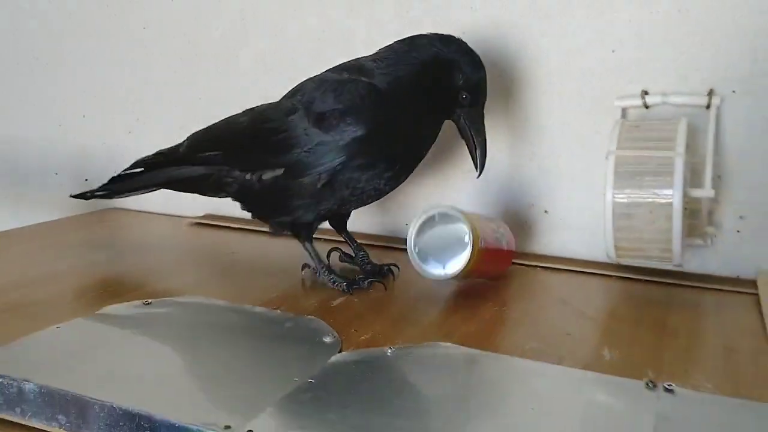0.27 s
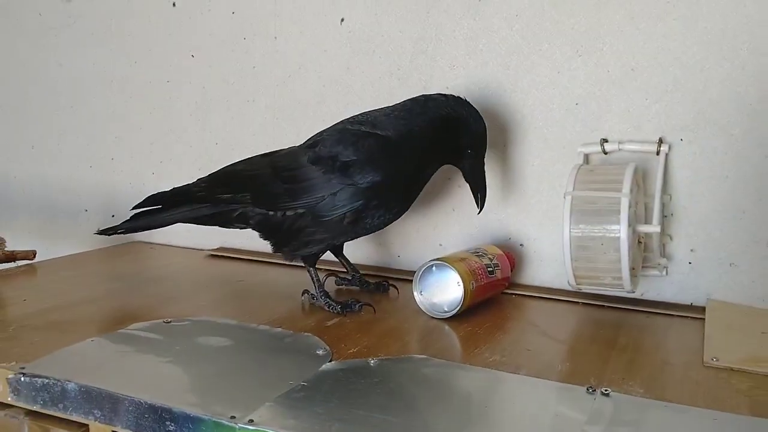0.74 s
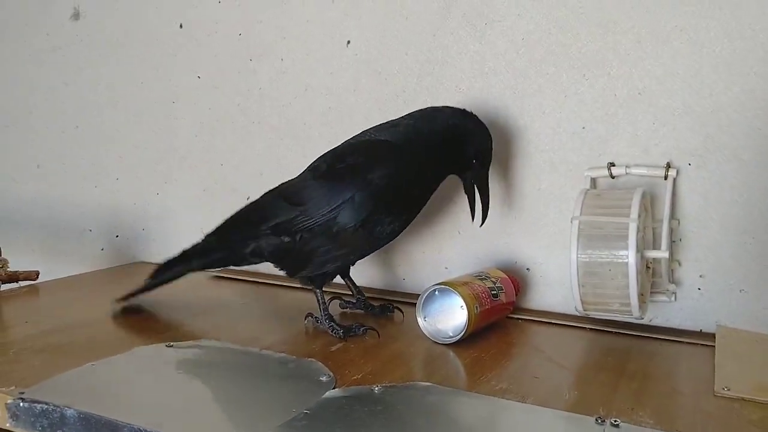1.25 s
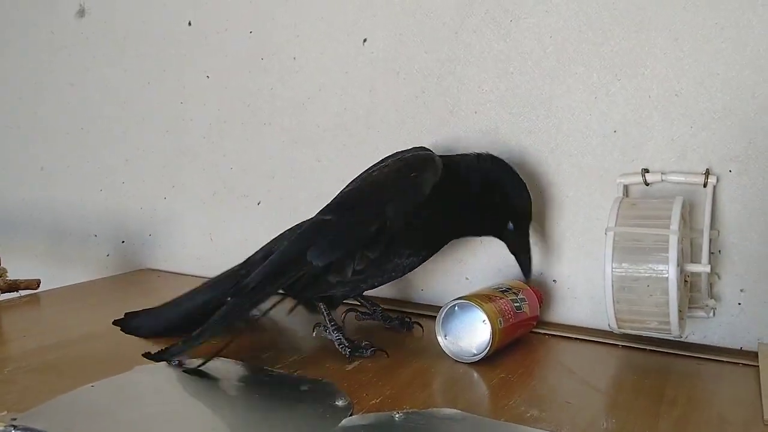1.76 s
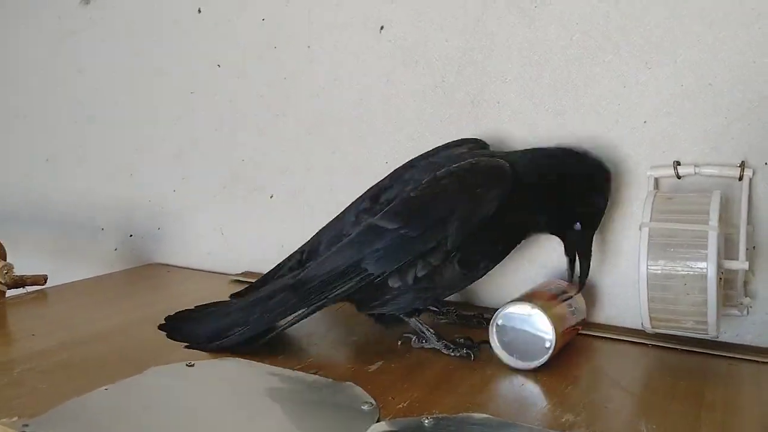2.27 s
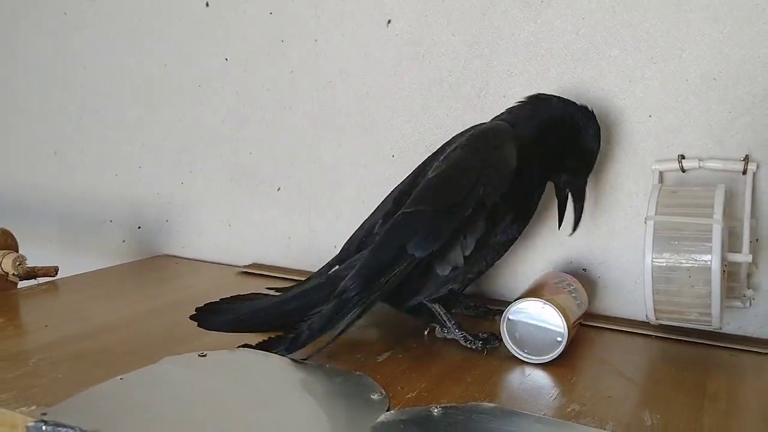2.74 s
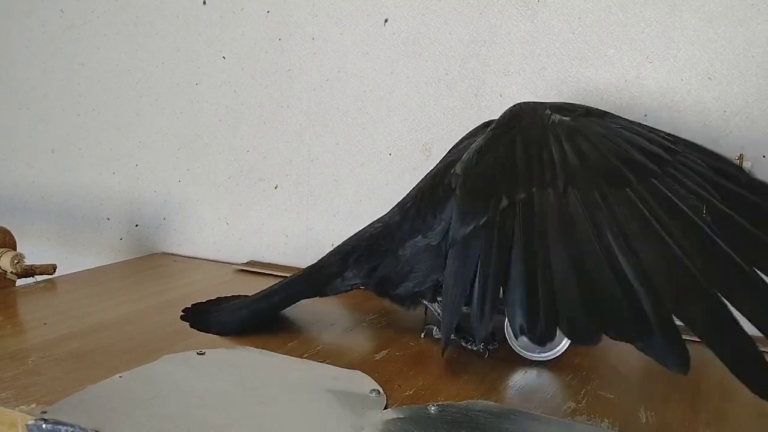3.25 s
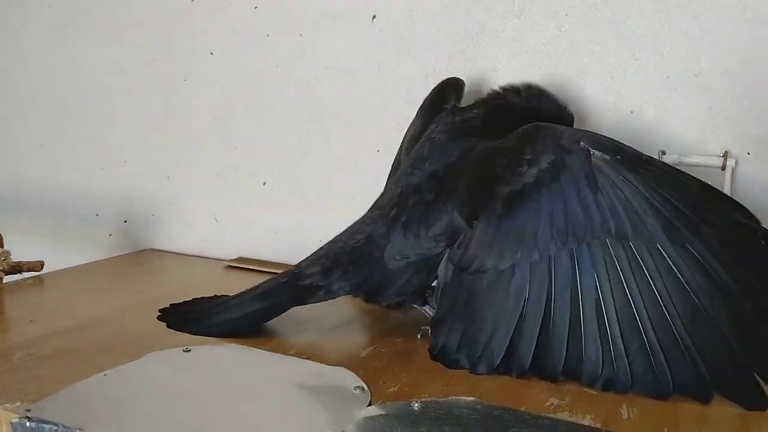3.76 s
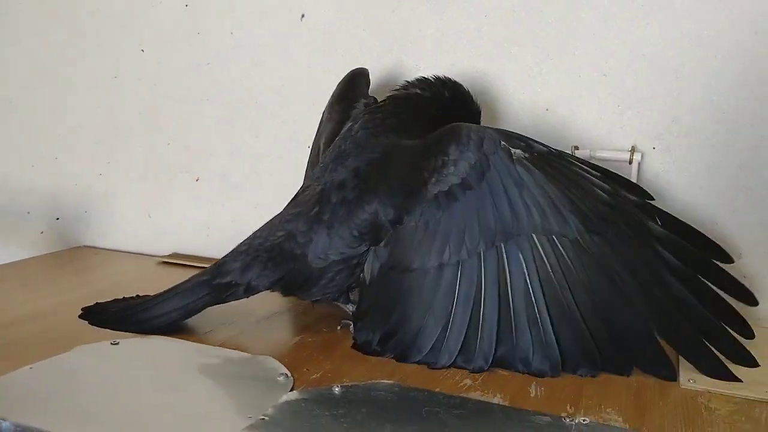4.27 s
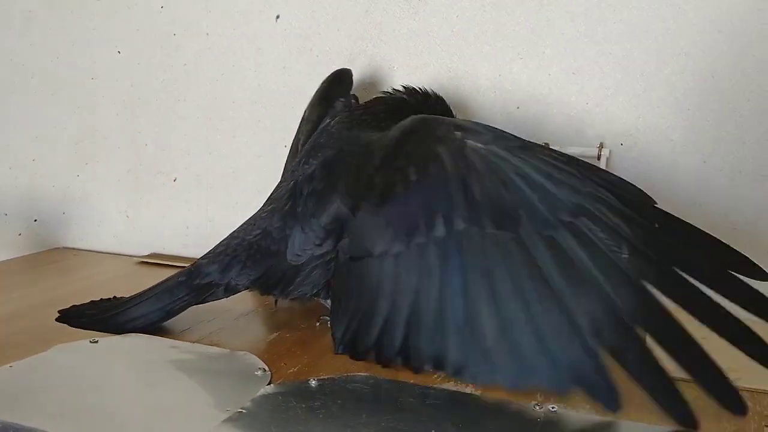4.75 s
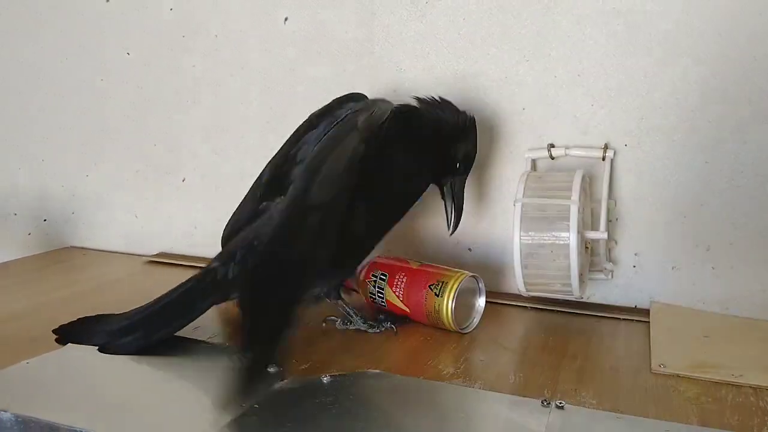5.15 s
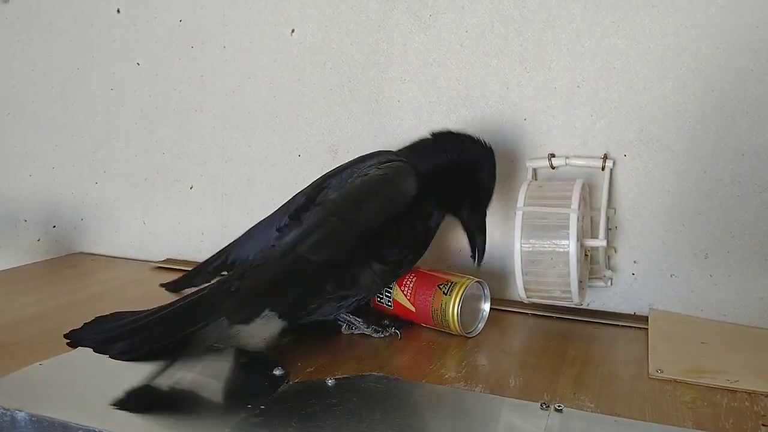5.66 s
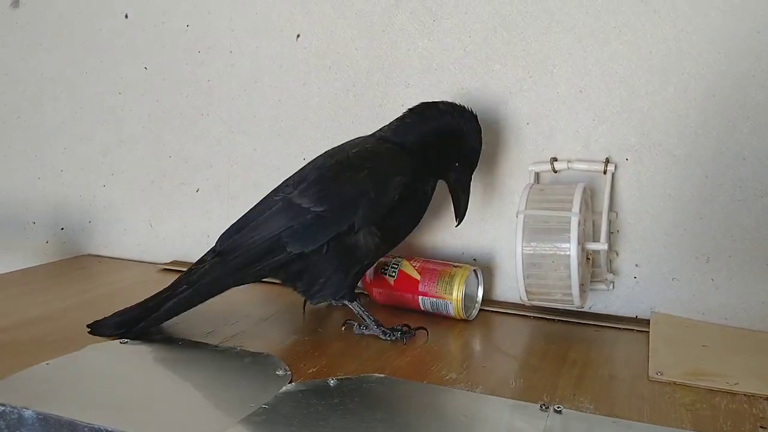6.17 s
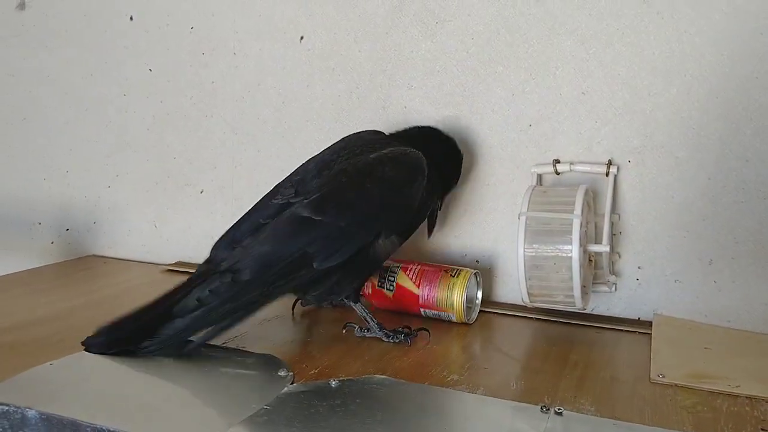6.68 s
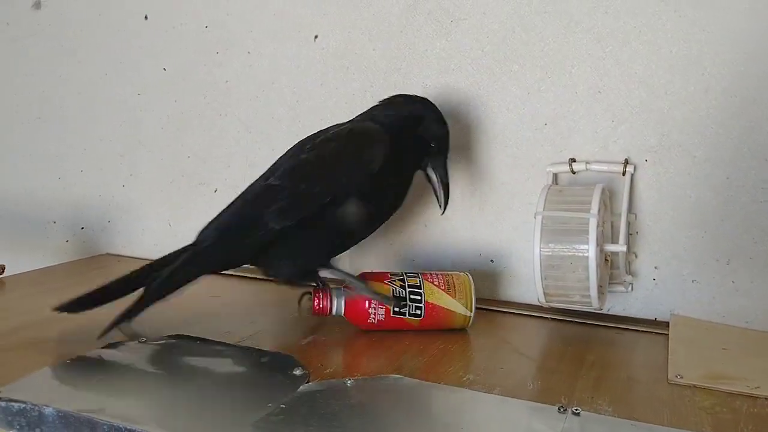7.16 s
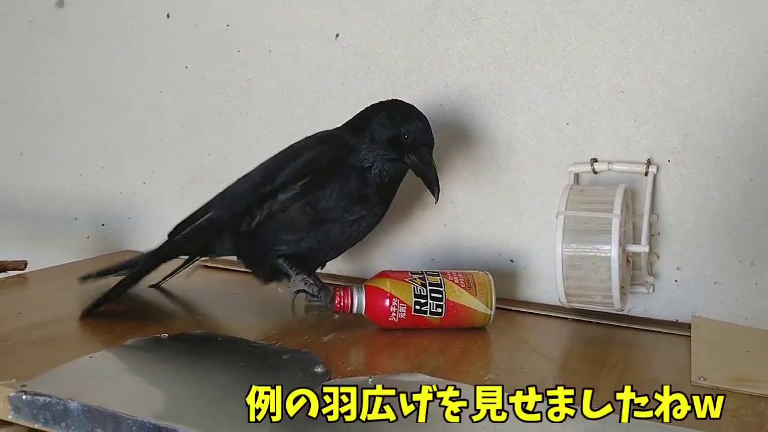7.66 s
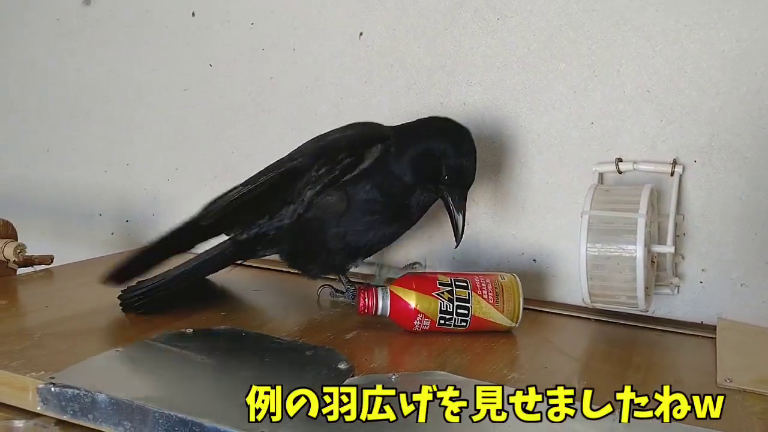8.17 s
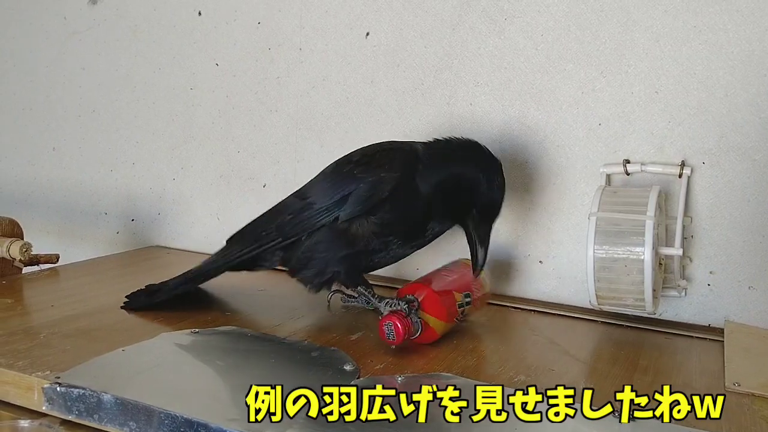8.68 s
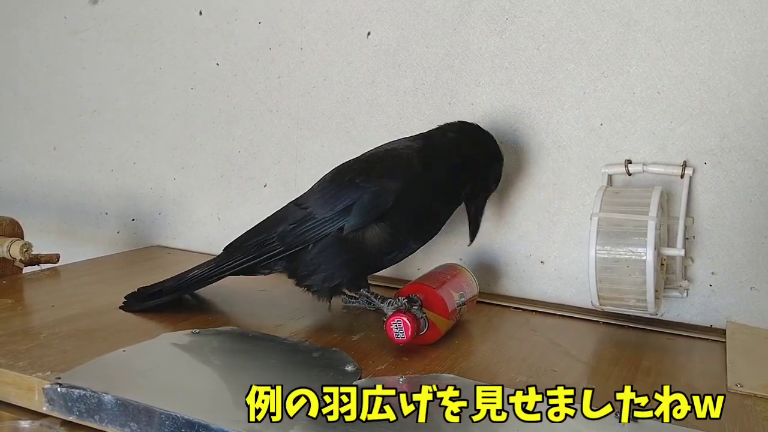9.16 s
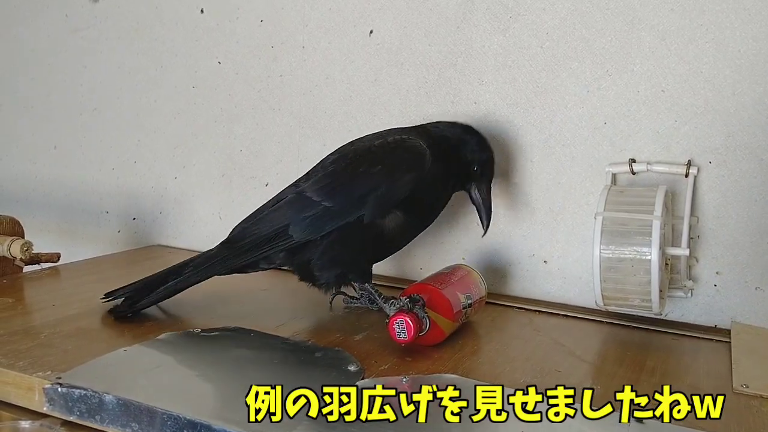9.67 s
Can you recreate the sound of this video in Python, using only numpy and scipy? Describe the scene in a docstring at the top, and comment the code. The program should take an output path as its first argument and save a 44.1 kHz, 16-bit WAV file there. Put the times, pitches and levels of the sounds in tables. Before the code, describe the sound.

An empty aluminium bottle clatters onto a wooden table, then a crow's beak taps and shoves it while wing feathers brush the wood in a small room.

```python
"""A crow pecks and shoves an empty aluminium bottle about a wooden table in a small bare room.
A faint room tone runs throughout: coloured noise and a slightly wavering hum.
From the start, knocks and taps click with noise, ring the bottle and thump the table; the room echoes them.
Later feathers brush the table as softly coloured, fluttering noise while the bird spreads its wings.
After some shoves the bottle rocks in ever quicker, weaker bounces, and a faint low sine note swells."""
import sys
import numpy as np
from scipy import signal
from scipy.fft import rfft, irfft
from scipy.io import wavfile

SR = 44100
rng = np.random.default_rng(int(sys.argv[2]) if len(sys.argv) > 2 else 0)


def int16_out(signal):
    """Quantize to a 16-bit WAV file."""
    q = np.round(np.clip(np.atleast_2d(signal).T, -1, 1) * 32767)
    wavfile.write(sys.argv[1], SR, q.astype(np.int16))


N = 437472
TIME = np.arange(N) / SR  # seconds into the scene

SIZE = 24000  # samples in one blow and its echo
AGE = np.arange(SIZE) / SR  # seconds since the blow
HZ = np.fft.rfftfreq(SIZE, 1 / SR) + 1e-3  # kept just above zero


def undb(db):
    """Decibels to gain."""
    return 10 ** (np.asarray(db) / 20)


def unit(x):
    """Scale to rms 1."""
    return x / np.sqrt(np.mean(np.abs(x) ** 2))


def curve(rows):
    """Join (seconds, value) rows by straight lines."""
    return np.interp(TIME, *np.transpose(rows))


def walk(rate):
    """Random wandering of rms 1: straight lines between `rate` random points per second."""
    steps = rng.standard_normal(4096)
    return unit(np.interp(TIME * rate, np.arange(len(steps)), steps))


def swells(rows):
    """Gain of swells that climb and sink by 20 dB in their rise and fall times."""
    gain = 0
    for peak_s, db, rise_s, fall_s in rows:
        distance = np.maximum((peak_s - TIME) / rise_s, (TIME - peak_s) / fall_s)
        gain = gain + undb(db - 20 * distance)
    return gain


def colour(points, hz):
    """Gain of (Hz, dB) points joined on a log-frequency axis."""
    point_hz, db = np.transpose(points)
    return undb(np.interp(np.log(hz + 1), np.log(point_hz), db))


def diffuse(envelope, spacing_m=0.15):
    """Spectra of noise from all sides at two ports: alike in the bass, unrelated in the treble."""
    mid, side = rfft(rng.standard_normal((2, len(envelope))) * envelope)
    hz = np.fft.rfftfreq(len(envelope), 1 / SR)
    alike = 0.97 * np.sinc(2 * hz * spacing_m / 343)  # sound travels 343 m/s
    return mid * np.sqrt(1 + alike) + side * np.sqrt(1 - alike) * np.array([[1], [-1]])


def steady_noise(points):
    """Coloured stereo noise of rms 1."""
    spectrum = diffuse(np.ones(N)) * colour(points, np.fft.rfftfreq(N, 1 / SR))
    return unit(irfft(spectrum, N))


def room_tone(sway_db=0.74):
    """Quiet air noise and a slightly unsteady hum."""
    # Colour of the air noise. Each row: frequency in Hz, relative level in dB
    air_colour = [(12, -41.5), (20, -3), (56, -7), (118, -36), (135, -13), (177, -22.5), (258, -13),
                  (387, -17.5), (682, -12), (759, -20), (845, -13), (967, -18), (1450, -17), (2350, -27.5),
                  (12500, -38), (16200, -69.5), (22000, -120)]
    # Steady hum tones. Each row: frequency in Hz, middle level in dB
    hum_tones = [(50, -68), (269, -69), (643, -73.5)]
    hum = 0
    for hz, db in hum_tones:
        hum = hum + np.sqrt(2) * undb(db + 2.5 * walk(4.2)) * np.sin(2 * np.pi * hz * TIME)
    air_db = -56 + sway_db * walk(3)
    return steady_noise(air_colour) * undb(air_db) + hum


def mode(hz, width):
    """Response of one damped resonance, gain 1 at its centre."""
    return 1 / (1 + 1j * (HZ ** 2 - hz ** 2) / (HZ * width))


def resonances(modes):
    """Response of a body; each mode is applied twice for steep flanks."""
    return sum(undb(db) * mode(hz, width) ** 2 for hz, width, db in modes)


def causal(gain):
    """Minimum-phase response of a gain curve: nothing sounds before the blow."""
    cepstrum = irfft(np.log(gain))
    cepstrum[1:SIZE // 2] *= 2
    cepstrum[SIZE // 2 + 1:] = 0
    return np.exp(rfft(cepstrum))


def contact(chatter_s, grit_db=6.5):
    """The touch bites, then fades in a chatter of micro-contacts."""
    grains = np.repeat(undb(grit_db * rng.standard_normal(SIZE // 20)), 20)
    age = AGE / chatter_s
    envelope = grains * (1 - np.exp(-8 * age)) * np.exp(-age / 2)
    return unit(diffuse(envelope, spacing_m=0.065))


def reverberation(t60, build_s):
    """The room's answer: reflections thicken, then die away by 60 dB in t60 seconds."""
    thicken = 1 - np.exp(-AGE / build_s)
    return unit(diffuse(thicken * np.exp(-np.log(1000) * AGE / t60)))


def blows(rows, click_colour, pan_db, push_db, hollow_push_db, metal_db):
    """Each blow drives table, bottle and contact noise, heard directly and through the room."""
    # In the next five, each row: frequency in Hz, width of one pass in Hz, relative level in dB
    # The table top bending as a whole
    thump_modes = [(50, 12, -12), (75, 17, -9.5), (153, 34.8, 8), (195, 41, -15.5)]
    # The table's boards
    board_modes = [(212, 44, -1.5), (235.7, 38, 3.5), (269.2, 50, 1), (223, 270, -18)]
    # The wood around the point of contact
    wood_modes = [(324.3, 43, -1), (387.5, 33.4, 0.5), (445.3, 41, 1), (469.8, 18, -1), (511, 47, -3),
                  (446, 320, -10.5)]
    # The bottle's hollow body
    hollow_modes = [(595.2, 18, 1), (650.4, 89, 4.5), (702, 52, -4.5), (773.6, 48, -0.5), (740, 635, -8.5),
                    (644, 21, -9)]
    # The higher bending modes of the bottle's shell
    shell_modes = [(884, 49, 5.5), (1007, 142, 1.5), (1187, 193, 2), (1282, 75, -0.5), (1394, 255, -4.5),
                   (1597, 100, -9), (1503, 1320, -7.5)]
    # The thin metal wall tinkles in many close modes. Each entry: frequency in Hz
    metal_hz = [1770, 2008, 2337, 2680, 2940, 3234, 3466, 3786, 4130, 4520, 4790, 5170, 5500, 5640, 6230,
                6710, 7530, 8400, 9470, 10580]
    # the wall behind the table cancels a narrow band of the bass
    null = 1 - mode(hz=98, width=21)
    body_modes = (thump_modes, board_modes, wood_modes, hollow_modes, shell_modes)
    bodies = [null * resonances(modes) for modes in body_modes]
    metal = np.array([mode(hz, width=70) for hz in metal_hz])
    contact_colour = causal(colour(click_colour, HZ))
    octaves = np.log2(np.clip(HZ, 1500, None) / 5000)  # brightness tilts around 5 kHz
    pan = undb(np.array([[pan_db], [-pan_db]]) / 2)
    span = np.sqrt(0.05 * SR)  # levels are the rms of a blow's energy spread over 50 ms
    fade = np.minimum(1, 10 * (1 - AGE / AGE[-1])) ** 2  # the tail ends in silence
    out = np.zeros((2, N + SIZE))
    for s, *levels_db, bright_db, direct_db, chatter_s in rows:
        touch = contact(chatter_s)
        # thump, boards and wood get slightly less direct sound than the click, the hollow body more
        push = undb(push_db + direct_db) * touch
        deep = reverberation(t60=0.3, build_s=0.002) + push
        low = reverberation(t60=0.42, build_s=0.0004) + push
        mid = reverberation(t60=0.42, build_s=0.0024) + undb(hollow_push_db) * push
        high = reverberation(t60=0.33, build_s=0.0026 + chatter_s) + undb(direct_db) * touch * pan
        # each spot on the bottle wakes its own mix of metal modes
        tinkle = undb(metal_db) * rng.standard_normal(len(metal_hz)) @ metal
        click = contact_colour * (1 + tinkle) * undb(bright_db * octaves)
        drives = (deep, low, low, mid, high, high)
        blow = 0
        for db, body, drive in zip(levels_db, bodies + [click], drives):
            blow = blow + undb(db) * unit(body * drive)
        start = int(s * SR)
        out[:, start:start + SIZE] += span * fade * irfft(blow)
    return out[:, :N]


def body_levels(s, thump_db, body_db, hollow_db, click_db):
    """Levels of thump, boards, wood, hollow, shell and click, by the time and how hard the hit is."""
    # Levels against the body, as the bottle travels over the table and ends up underfoot
    # Each row: time in seconds, boards level in dB, shell level in dB before hardness is added
    body_shares = [(0.1, 1.5, -2), (0.9, -3.5, 0.5), (2.4, -4, 1), (3.3, -1.5, 0), (4.1, -1.5, -0.5),
                   (5.8, -1.5, 0.5), (6.6, -6, 0.5), (8.1, 0.5, -5.5), (8.4, 1, -3.5), (9.1, 7, -9.5),
                   (9.7, -2, -0.5)]
    times, boards_db, shell_db = np.transpose(body_shares)
    hardness_db = 0.14 * (click_db - body_db)  # a hit with more click wakes more of the shell
    boards = body_db + np.interp(s, times, boards_db)
    wood = body_db - 0.5
    shell = body_db + np.interp(s, times, shell_db) + hardness_db
    return thump_db, boards, wood, hollow_db, shell, click_db


def during(s, span):
    """True while s lies within the span."""
    return span[0] < s < span[1]


def knock(s, thump_db, body_db, hollow_db, click_db, bright_db, contact_s):
    """The bottle meets the table: a short contact stands out from the room, the spread wing screens it."""
    clean_db = 0.5 * np.log2(0.0032 / contact_s)  # more direct sound for each halving of the contact
    wing_db = -5 * during(s, (2.9, 5.1))  # the wing is open between these seconds
    direct_db = -1.5 + clean_db + wing_db
    levels_db = body_levels(s, thump_db, body_db, hollow_db, click_db)
    return s, *levels_db, bright_db, direct_db, contact_s


def tap(s, click_db, body_db, bright_db, direct_db, contact_s):
    """Beak or claw hits the metal: mostly click, with a little of the body."""
    thump_db = body_db - 14  # a tap hardly moves the table
    hollow_db = body_db + 2.5
    levels_db = body_levels(s, thump_db, body_db, hollow_db, click_db)
    return s, *levels_db, bright_db, direct_db, contact_s


def feathers(flutter_db=3.5, barb_db=2):
    """Vanes slide over the wood, catching and slipping barb by barb: noise with slow and fast flutter."""
    # Colour of the rustle. Each row: frequency in Hz, relative level in dB
    feather_colour = [(120, -1), (400, 7), (800, 8), (1500, 1.5), (3000, -1), (5500, 3), (8000, -4.5),
                      (12000, -10)]
    # Soft rustle between the sweeps. Each row: time in seconds, level in dB
    brush = [(0, -88), (1.45, -57), (2.3, -63), (3.2, -50.5), (3.9, -55.5), (4.8, -56.5), (5.2, -64),
             (5.6, -52), (6.1, -67), (6.7, -56), (7.35, -78), (9.92, -90)]
    # Feathers sweep over the table
    # Each row: peak in seconds, level in dB, rise in seconds, fall in seconds
    sweeps = [(1.85, -38, 0.27, 0.56), (2.56, -49, 0.088, 0.14), (2.91, -42, .12, 0.17),
              (3.52, -40, .07, 0.099), (4.27, -44, 0.45, 0.084), (4.65, -44, 0.24, 0.1),
              (4.98, -37, 0.26, 0.052), (5.79, -32, 0.081, 0.13), (7.02, -34, 0.22, 0.21),
              (7.48, -43, 0.045, 0.21), (8.09, -44.5, 0.057, 0.22)]
    catching = unit(undb(flutter_db * walk(32) + barb_db * walk(350)))
    loudness = np.hypot(undb(curve(brush)), swells(sweeps))
    return steady_noise(feather_colour) * catching * loudness


def rock(s, gap_s, *levels_db, count):
    """After a shove the bottle rocks in dull bounces, each sooner and weaker than the last."""
    for k in range(count):
        weaker_db = np.array(levels_db) - 6 * k
        yield knock(s, *weaker_db, bright_db=-8.5, contact_s=0.0015)
        s = s + gap_s * 0.8 ** k  # each gap is shorter than the one before


def lingering_note():
    """A faint, wavering sine note hangs on between the knocks."""
    # Swells of the note. Each row: peak in seconds, level in dB, rise in seconds, fall in seconds
    note_swells = [(2.25, -52.5, .2, .5), (2.85, -45, 0.21, 0.23), (3.33, -51, .1, .3),
                   (3.8, -45, 0.25, .12), (5.1, -54.5, 0.23, 0.73)]
    pitch_hz = 372 + 4 * walk(7.7)
    phase = 2 * np.pi * np.cumsum(pitch_hz) / SR
    return np.sqrt(2) * np.sin(phase) * swells(note_swells)


def scene():
    """Bottle, beak and feathers in the room."""
    # The bottle is shoved or drops and knocks on the table
    # Each row: start in seconds, table thump in dB, body in dB, hollow ring in dB, click in dB,
    # click brightness in dB per octave, contact length in seconds
    knock_rows = [(0.001, -25.5, -31.5, -31, -34, -6, 0.0006), (0.028, -40, -29, -31, -30.5, -9, 0.001),
                  (0.054, -20.5, -16.5, -19, -21.5, -5.5, 0.00088),
                  (0.133, -23.5, -24.5, -27.5, -31, -6.5, 0.00036),
                  (0.152, -43, -23, -25.5, -32.5, -6.5, 0.00065),
                  (0.206, -20.5, -24.5, -23, -28, -3, 0.0008), (0.272, -42, -32, -44, -31.5, -2, .004),
                  (0.332, -52, -36.5, -40, -59, -15, 0.0035), (0.906, -43, -37.5, -37.5, -38, -1, 0.004),
                  (1.22, -40.5, -35, -32.5, -36, 0, 0.0081), (1.497, -40, -35.5, -41, -34.5, -1, 0.0045),
                  (1.535, -52, -37.5, -46, -55, -3, 0.0012), (1.773, -31.5, -37, -41, -59, 0, 0.0022),
                  (1.807, -55, -38.5, -32, -37, -2, 0.0022),
                  (2.007, -21.5, -31.5, -26.5, -29.5, 0.5, 0.0021),
                  (2.393, -34, -40, -25, -32, -3.5, 0.0053), (2.422, -53, -37, -31.5, -53, 6, 0.0026),
                  (2.705, -29, -39.5, -34.5, -31, -1, 0.0065), (2.993, -25.5, -37, -26.5, -30, 0, 0.0021),
                  (3.286, -24.5, -28, -28.5, -34, -2, 0.0045),
                  (3.551, -27.5, -31.5, -32, -30.5, -2, 0.0016),
                  (4.102, -38, -32, -28.5, -29, -1.5, 0.0045), (4.167, -34, -36, -35.5, -37.5, -7, 0.0024),
                  (4.265, -67, -49, -38.5, -45.5, -1, 0.01), (4.811, -30.5, -35, -45, -25, -1.5, 0.0027),
                  (4.894, -38.5, -34, -35.5, -31.5, -2.5, 0.0092),
                  (5.505, -47.5, -53.5, -60, -54.5, 6, 0.0038), (5.811, -24, -21, -27.5, -24, -4, 0.0018),
                  (6.352, -44, -35, -56, -26, -1.5, 0.0044), (6.66, -41, -32, -24.5, -27, -2.5, 0.0016),
                  (6.672, -34.5, -32.5, -20.5, -30.5, -18, 0.0022),
                  (8.113, -29.5, -32, -36.5, -32.5, -1.5, 0.0032), (8.136, -38, -29, -30, -40, -9, .003),
                  (8.367, -34, -34.5, -31, -25.5, -4, 0.0057), (8.382, -40, -27.5, -29.5, -48, -4, 0.0083),
                  (8.512, -50, -30.5, -35.5, -44, -6.5, 0.0025),
                  (9.091, -60, -44.5, -43.5, -45.5, 4, 0.0053), (9.143, -55, -47.5, -45, -66, -7, .003),
                  (9.225, -67, -49.5, -48.5, -64, 0, 0.004), (9.71, -39.5, -32, -37, -26.5, -1.5, 0.0051),
                  (9.735, -58, -25, -26, -48, -6, 0.015)]
    # Beak and claws snap on the bare metal
    # Each row: start in seconds, click in dB, body in dB, click brightness in dB per octave,
    # direct over room sound of the click in dB, contact length in seconds
    tap_rows = [(0.016, -28.5, -28.5, 3.5, 2.5, 0.0034), (0.256, -27, -36, 0.5, 8.5, 0.0042),
                (1.634, -37.5, -60, 2.5, -4, 0.0031), (1.692, -24.5, -36.5, 0.5, 22.5, 0.0021),
                (1.708, -18, -30, -1, 3, .004), (1.907, -27, -44, -0.5, 2, .0015),
                (1.919, -24, -35, 0, 4, 0.0013), (2.347, -36.5, -48, -0.5, -3.5, .0023),
                (4.603, -40, -54, -2.5, -18, 0.0057), (4.823, -37, -30, -18, -12, 0.001),
                (4.931, -27.5, -37.5, -2.5, 6.5, .004), (5.75, -33, -63, -2.5, 11, 0.00096),
                (6.36, -26, -28.5, -9, -7, 0.0018), (6.869, -38, -49.5, 1.5, 2.5, 0.0037),
                (6.956, -21.5, -37.5, 0.5, -2.5, .00045), (6.965, -25.5, -34.5, 0.5, 20.5, 0.0031),
                (7.154, -25.5, -43.5, 0, 1.5, 0.0093), (7.391, -42, -62.5, 1, -7.5, 0.0095),
                (7.4973, -22, -29.5, 1.5, 3.5, .0011), (7.787, -42, -62, 0, -4, 0.0054),
                (7.946, -40, -63, 3.5, -1, 0.0064), (8.633, -55.5, -53, -2, 2, 0.0038),
                (9.281, -54, -57, 2, 1, .001)]
    # After a shove the bottle rocks to rest; the levels are those of the first bounce
    # Each row: start in seconds, first gap in seconds, table thump in dB, body in dB,
    # hollow ring in dB, click in dB
    rocking_rows = [(2.062, 0.038, -31, -31.5, -20, -31.5), (2.745, 0.032, -38, -33, -26.5, -48),
                    (3.038, 0.041, -33, -30.5, -29.5, -37), (3.336, .035, -30.5, -31, -27.5, -40),
                    (3.595, .037, -32, -30, -31.5, -37.5), (5.874, .047, -39, -29, -31.5, -31),
                    (6.713, 0.078, -39, -32, -29.5, -44), (8.173, .019, -33, -26.5, -31.5, -38)]
    # Colour of the contact noise of knocks. Each row: frequency in Hz, relative level in dB
    knock_colour = [(500, -39), (1200, -2.5), (1900, -1.5), (2800, -3), (4000, -0.5), (5300, -4),
                    (7000, -4), (9000, -10.5), (12300, -11.5), (13500, -53)]
    # Colour of the contact noise of taps. Each row: frequency in Hz, relative level in dB
    tap_colour = [(300, -31), (1200, -2.5), (2000, 0), (2800, 1.5), (4000, 2.5), (5300, 2.5), (7000, 1),
                  (9000, -3), (12300, -9), (13500, -28.5)]
    landings = [knock(*row) for row in knock_rows]
    for row in rocking_rows:
        landings.extend(rock(*row, count=3))
    pecks = [tap(*row) for row in tap_rows]
    knocks = blows(landings, knock_colour, pan_db=-1.5, push_db=-1, hollow_push_db=2.5, metal_db=-0.5)
    taps = blows(pecks, tap_colour, pan_db=-1, push_db=-1, hollow_push_db=2.5, metal_db=0.5)
    return room_tone() + knocks + taps + feathers() + lingering_note()


def record(dry):
    """The recorder clips the sharpest peaks and cuts the top above 12750 Hz."""
    clipped = np.clip(dry, -0.8, 0.8)
    low_pass = signal.ellip(8, 0.3, 70, 12750, fs=SR, output="sos")
    return signal.sosfilt(low_pass, clipped)


dry = scene()
out = record(dry)
int16_out(out)
```